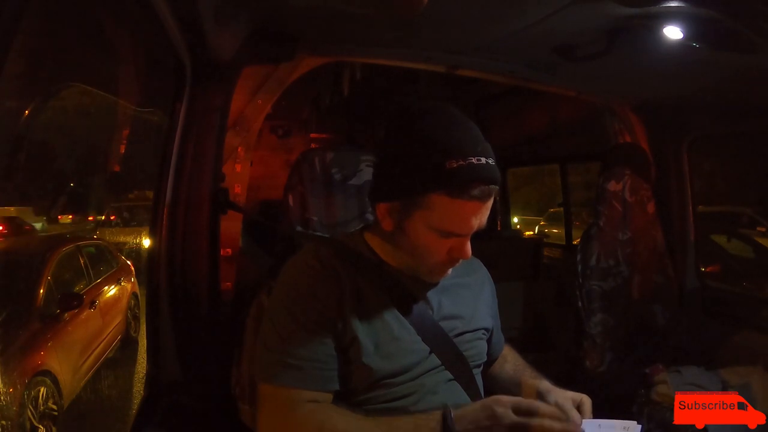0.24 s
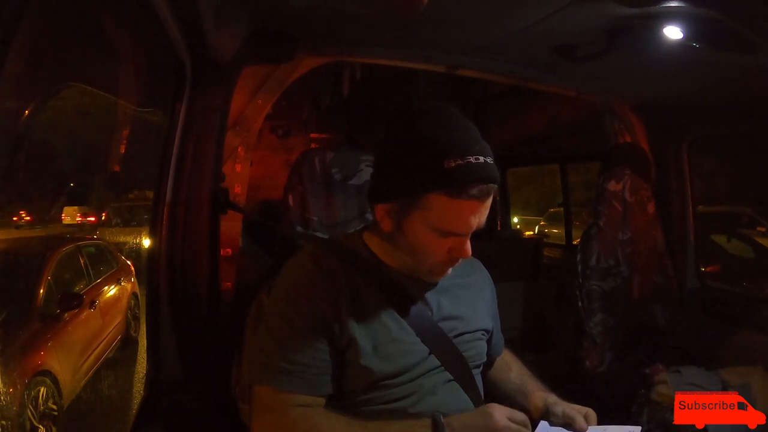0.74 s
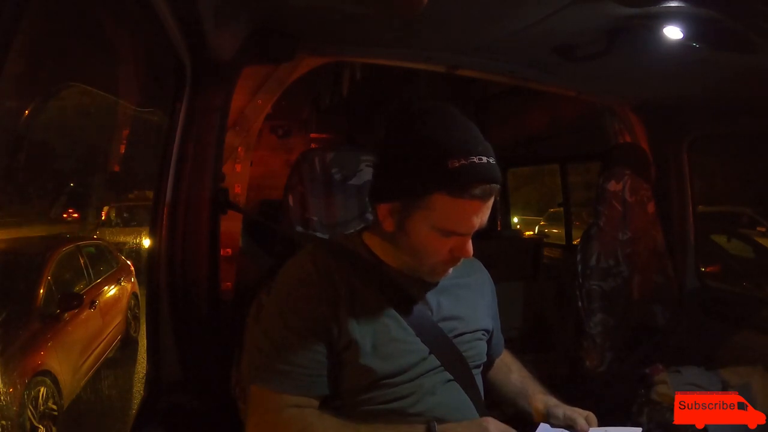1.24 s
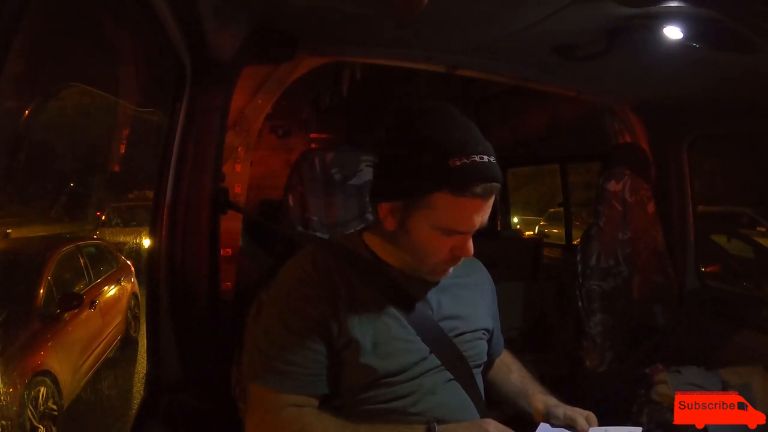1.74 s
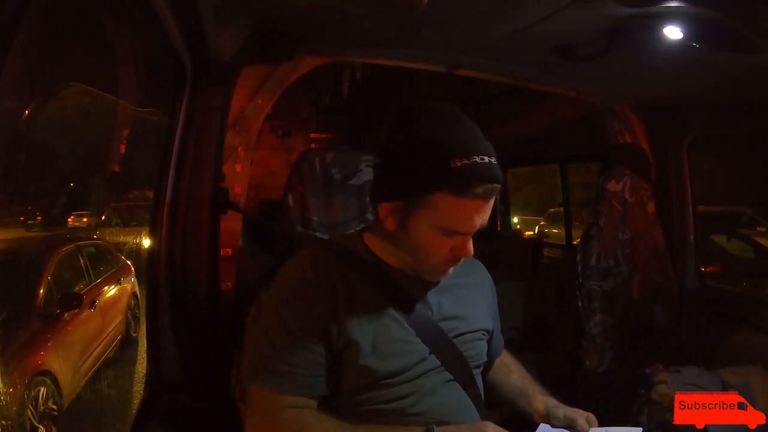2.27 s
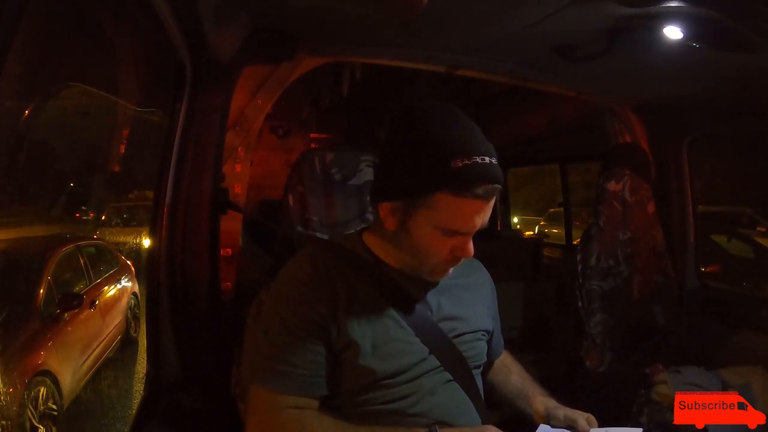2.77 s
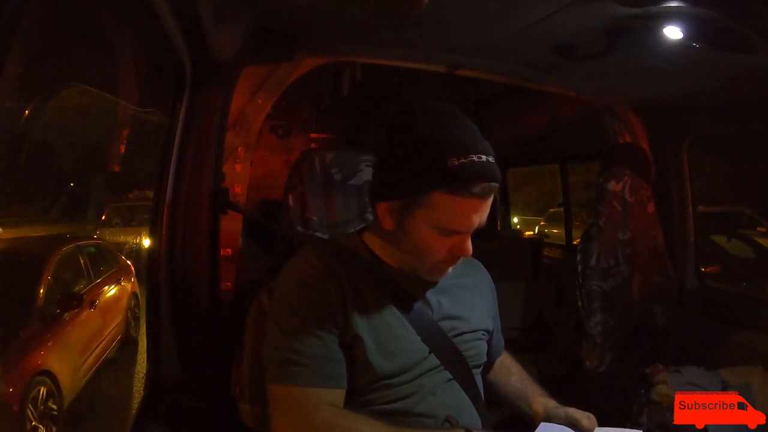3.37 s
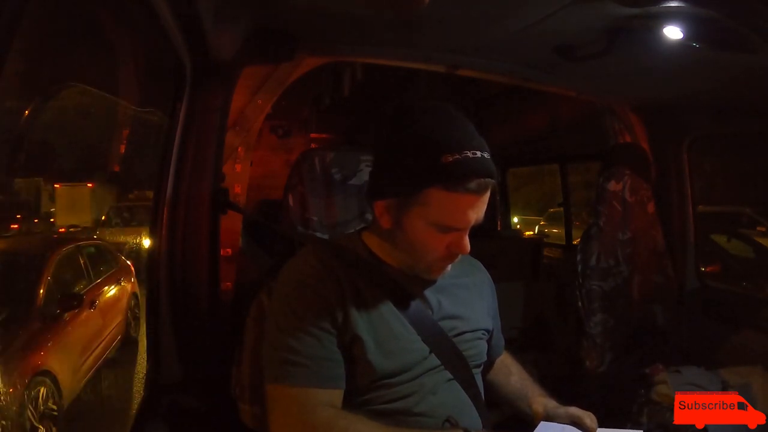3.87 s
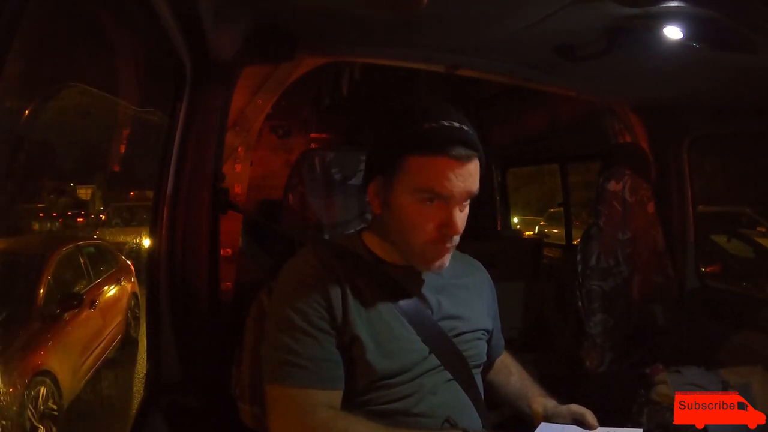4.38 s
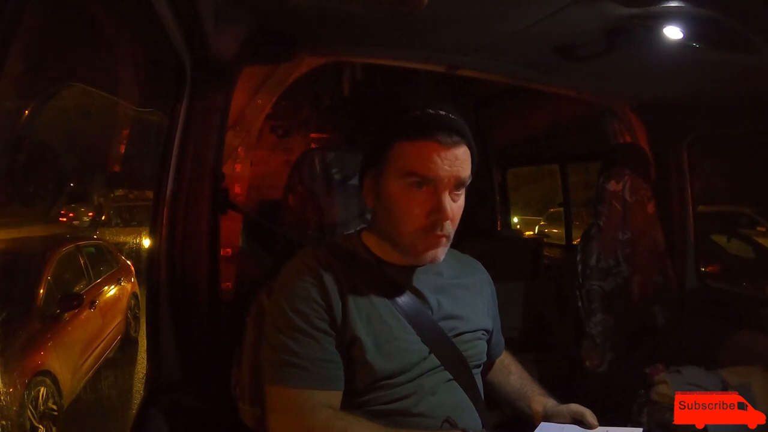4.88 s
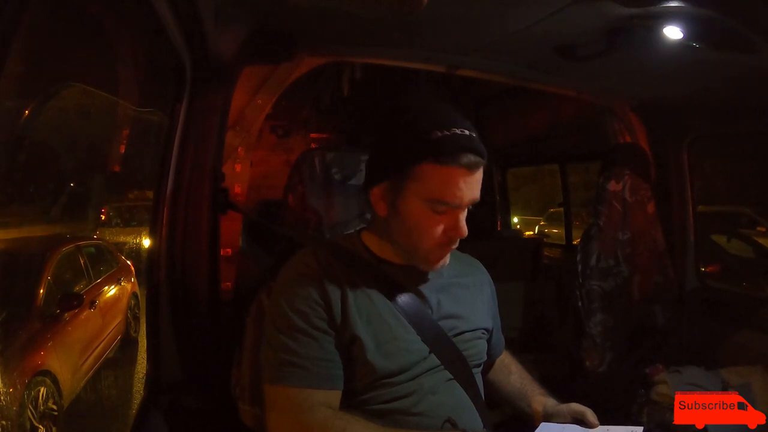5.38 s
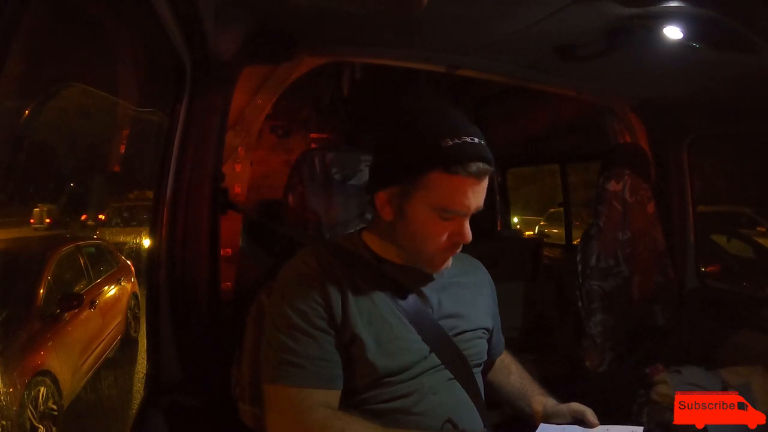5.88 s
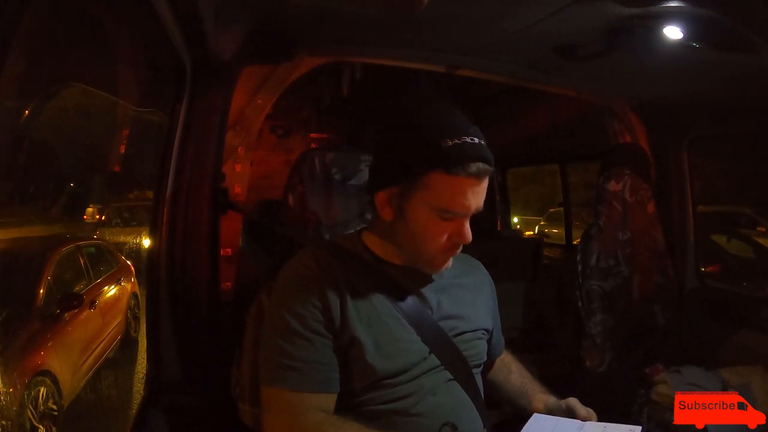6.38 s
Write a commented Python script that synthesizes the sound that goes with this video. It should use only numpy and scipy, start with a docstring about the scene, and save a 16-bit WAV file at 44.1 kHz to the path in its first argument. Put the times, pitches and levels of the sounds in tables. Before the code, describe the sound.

A low diesel idle and the rumble of queued traffic fill a van's cab throughout. In the first half second a hand slides softly over paper, with a few small crinkles. From about 1 second a twin-cylinder motorcycle approaches, its muffled exhaust rising and falling in short throttle blips and booming in the cab. It grows clearly louder from 2.5 seconds, with thin engine clatter and a faint tyre hiss at the side window. It is loudest alongside at about 3.3 to 3.7 seconds, burbling and giving a quick run of five deep pops. After 4 seconds it is quieter, revving several more times as it pulls away, and is gone by about 5.8 seconds. The idle and rumble carry on with slight low swells, and the paper rubs and crinkles faintly again from 6.2 seconds to the end.

```python
"""Inside a van idling in a traffic queue. A twin-cylinder motorcycle filters past, on and off the throttle.
Its exhaust orders boom in the cab; uneven firings burble and pop alongside, then it pulls away.
Valve and chain clatter comes through the side window and rings the glass. The driver slides a hand
over a sheet of paper. Under it all: diesel hum, droning trim, rumble of the queue."""
import sys
import numpy as np
from scipy import signal
from scipy.fft import rfft, irfft, next_fast_len
from scipy.io import wavfile
from scipy.ndimage import uniform_filter1d, map_coordinates

SR = 44100
rng = np.random.default_rng(int(sys.argv[2]) if len(sys.argv) > 2 else 0)


def digitize_waveform(pressure):
    """Quantize a signal to 16-bit integers and store it at the path in sys.argv[1].

    Rows of a 2-D input are taken as channels; values are limited to [-1, 1].
    """
    field = np.atleast_2d(pressure).T
    bounded = np.clip(field, -1, 1)
    quanta = np.round(bounded * 32767).astype(np.int16)
    wavfile.write(sys.argv[1], SR, quanta)


N = 291957
T = np.arange(N) / SR

# throttle twists: open/s, start rate/Hz, close/s, peak rate/Hz, rise exponent, opening/0-1
TWISTS = [(.12, 49, .3, 56, 0.83, .4), (1, 41.44, 1.2, 44.5, 1.01, 0.57),
          (1.33, 39.2, 1.45, 46.31, 1.04, 0.29), (1.53, 45.39, 1.69, 54.88, 1.08, 0.56),
          (1.99, 40.55, 2.28, 53.94, 1.09, 0.38), (2.6, 41.48, 2.755, 57.83, 0.89, 0.49),
          (3.15, 31.53, 3.26, 42.03, 1.086, 0.84), (3.34, 34.12, 3.42, 44.95, 0.61, 0.19),
          (3.65, 37.8, 3.95, 49.62, .65, 0.16), (4.16, 35.78, 4.46, 37.36, 1.1, 0.21),
          (4.48, 37.46, 4.525, 39.84, 1.024, .4), (4.55, 40.02, 4.75, 43.19, 1.63, 0.31),
          (4.85, 40.44, 5.0, 44.42, 0.95, .35), (5.11, 40.06, 5.255, 46, 1.77, 0.24)]
# exhaust reaching the cab between the cars: t/s, level/dB
EXHAUST_LEVEL = [(.2, -58), (1, -43), (1.45, -33), (2.1, -41), (2.6, -27.5), (3.08, -26.5), (3.24, -26),
                 (3.29, -30), (3.6, -23.5), (3.96, -22.5), (4.05, -33), (4.6, -33.5), (5.05, -34.5),
                 (5.6, -42)]
# firing unevenness: t/s, roughness/0-1
ROUGHNESS = [(1.7, 0.08), (2.4, 0.25), (2.9, 0.3), (3.3, 0.13), (3.42, 0.34), (3.66, 0.34), (3.75, 0.1),
             (4.2, 0.12), (4.65, 0.12), (5.3, 0.24)]
# cab standing waves, for the low orders: f/Hz, gain/dB
CAB_RESPONSE = [(33, -16), (46, -19), (55, -9), (70, -7), (100, -7.5), (120, -2.5), (135, -2), (150, -9),
                (172, -12.5), (205, -2.5), (245, -1), (265, -2), (290, -5.5)]
# orders 1, 3, 5: full-throttle gain/dB, gain once past/dB
LOW_ORDER_GAINS = [(1, -11.5), (-5, -3.5), (-1.5, -3.5)]
# exhaust overtones: f/Hz, level/dB
BARK_SPECTRUM = [(200, 6.5), (260, 2.5), (330, 4), (400, 3), (460, -3), (530, -9), (590, -6), (670, -13),
                 (735, -15.5), (800, -31), (870, -18.5), (950, -24.5), (1220, -25.5), (1800, -36)]
# one order booms in the cab: t/s, f/Hz, level/dB, half-width/s
BOOMS = [(.2, 262, -42, 0.043), (.37, 265, -41, 0.08), (1, 212, -40.5, 0.042), (1.431, 135, -31.5, 0.03),
         (1.69, 56, -42, 0.075), (1.418, 370, -46.5, 0.12), (1.667, 387, -41.5, 0.088),
         (1.69, 445, -41.5, 0.12), (1.96, 205, -37, 0.23), (2.064, 355, -40.5, 0.053),
         (2.201, 52, -37, 0.03), (2.359, 255, -33, 0.054), (2.604, 124, -25, 0.033),
         (2.684, 255, -21.5, 0.019), (2.737, 56, -36.5, 0.12), (2.86, 255, -30, 0.044),
         (2.865, 148, -29.5, 0.037), (2.96, 130, -25, 0.044), (3.082, 108, -23.5, 0.028),
         (3.288, 116, -18.5, 0.015), (3.327, 108, -16.5, 0.033), (3.372, 205, -25, 0.017),
         (3.384, 125, -19, 0.026), (3.42, 45, -28.5, 0.031), (3.756, 225, -26.5, 0.028),
         (3.8, 735, -40.5, 0.03), (3.87, 338, -40.5, 0.14), (3.82, 372, -32.5, 0.062),
         (3.84, 512, -38.5, .07), (3.901, 590, -38, 0.032), (3.906, 242, -22, 0.038),
         (3.91, 145, -30, 0.054), (3.972, 48, -39, 0.036), (4.21, 860, -53, 0.1), (4.236, 180, -30, 0.1),
         (4.2, 400, -42, 0.11), (4.44, 190, -32, 0.081), (4.415, 595, -48, .07), (4.425, 410, -36.5, .08),
         (4.592, 445, -42, .06), (4.595, 645, -47, 0.062), (4.704, 210, -41, 0.061),
         (4.751, 128, -32.5, 0.18), (4.703, 335, -39.5, .08), (4.743, 560, -56, 0.065),
         (4.923, 340, -34, 0.055), (4.957, 480, -46, 0.098), (5.143, 320, -36.5, .04),
         (5.152, 651, -42.5, 0.044), (5.265, 505, -46.5, 0.11), (4.989, 131, -29, 0.064),
         (5.04, 212, -34, .03), (5.277, 228, -34.5, 0.04), (5.28, 275, -35.5, 0.024), (5.4, 130, -39, 0.21)]
# exhaust pulses: f/Hz, density/dB
THUD_SPECTRUM = [(25, -37), (50, -14.5), (80, 0), (125, 7.5), (170, -2), (240, -4.5), (330, -12),
                 (600, -79)]
# gas noise: f/Hz, density/dB
RASP_SPECTRUM = [(100, -37), (200, 2), (380, 6.5), (480, 1), (600, -6.5), (780, -13), (950, -26),
                 (1400, -25.5), (1900, -35.5), (3000, -44.5), (5000, -60.5), (8000, -85)]
# uneven combustion: t/s, half-width/s, thud/dB, rasp/dB
SPUTTERS = [(2.204, 0.043, -30.5, -47), (2.327, 0.078, -34.5, -58), (2.505, 0.049, -34, -30.5),
            (2.709, 0.067, -32, -32), (3.046, 0.036, -29, -45), (3.199, 0.059, -27.5, -43),
            (3.419, 0.072, -26, -24), (3.596, 0.04, -24, -30.5), (3.684, 0.028, -27.5, -25.5),
            (3.932, 0.037, -52, -34.5), (4.99, 0.092, -41.5, -43.5), (5.218, 0.089, -43.5, -38.5)]
# exhaust pops: t/s, then level/dB for each of the three modes
POPS = [(3.474, -11.5, -20, -31.5), (3.505, -9, -29.5, -36), (3.537, -4.5, -4, -21),
        (3.589, -9.5, -14, -27.5), (3.642, -15.5, -28, -24)]
# cab modes: f/Hz, T60/s
POP_MODES = [(118, 0.16), (245, 0.15), (440, 0.069)]
# gas rushes: t/s, half-width/s, f/Hz, bandwidth/Hz, level/dB
ROARS = [(3.41, .045, 740, 130, -43), (3.69, .03, 700, 160, -41), (3.83, .11, 1190, 200, -48.5)]
# clatter at the side window: t/s, level/dB
CLATTER_LEVEL = [(1.4, -86), (1.7, -74), (2.1, -69), (2.5, -66), (2.75, -59.5), (2.95, -63), (3.17, -58),
                 (3.26, -51.5), (3.33, -54), (3.44, -51.5), (3.7, -63), (3.92, -59.5), (4.3, -65),
                 (4.7, -61), (5.25, -66), (5.6, -73.5)]
# clatter through the window: f/Hz, density/dB
CLATTER_SPECTRUM = [(800, -38), (1800, -13.5), (2500, 1), (3200, -1), (4100, 1), (4400, -4), (5000, -8),
                    (5600, -15), (7000, -25), (12000, -60.5)]
# side glass: f/Hz, bandwidth/Hz, approaching/dB, leaving/dB, van idle/dB
GLASS_BANDS = [(3340, 75, 0, -20, -14), (3550, 150, -4.5, -12.5, -17.5), (3730, 120, -6.5, -2.5, -13),
               (4044, 110, 0, 1, 2.5), (4167, 110, -5, -7, -3), (4620, 220, -4.5, -8.5, -4.5),
               (5270, 250, -19, -19.5, -26.5), (6050, 120, -25.5, -17.5, -25)]
# glass sings at rev peaks: t/s, half-width/s, level/dB
GLASS_SWELLS = [(1.709, 0.064, -71), (2.73, 0.085, -59), (3.247, 0.027, -58), (4.65, 0.17, -75.5),
                (5.171, 0.19, -68.5)]
# tyre hiss: t/s, half-width/s, level/dB
TYRE_SWELLS = [(2.954, 0.56, -76), (3.082, 0.07, -73.5), (3.27, 0.046, -69), (3.42, 0.2, -69),
               (4.744, 0.23, -81), (5.22, 0.18, -88.5)]
# tyre hiss: f/Hz, density/dB
TYRE_SPECTRUM = [(2500, -35.5), (4800, 3.5), (6000, 0.5), (6800, -2), (8000, -7), (10000, -11),
                 (11600, -11.5), (13000, -26)]
# hand on paper: start/s, end/s, rub/dB, fine hiss/dB
STROKES = [(0.037, 0.202, -59.5, -73.5), (0.188, 0.22, -77.5, -70), (0.257, 0.383, -68, -92),
           (4.07, 4.085, -72, -80), (6.15, 6.62, -66.5, -98), (6.288, 6.345, -70, -89.5),
           (6.481, 6.503, -65, -80.5)]
# paper rub and crinkle: f/Hz, density/dB
PAPER_SPECTRUM = [(900, -10.5), (2200, 5), (3200, 2.5), (5000, -2.5), (6400, -9.5), (7800, -13),
                  (9500, -18.5), (11300, -19), (13000, -28)]
# fine paper hiss: f/Hz, density/dB
SHEEN_SPECTRUM = [(4000, -29), (7400, 1), (9000, -8), (11100, -3), (13000, -12.5)]
# paper flexing: t/s, snap/dB, snap f/Hz, snap T60/s, crinkle/dB, crinkle T60/s
PAPER_TICKS = [(0.0901, -37, 2050, 0.016, -51, 0.081), (0.5404, -38, 2930, .006, -49, 0.023),
               (0.547, -56, 4180, .006, -56, 0.056), (6.487, -45, 2800, .02, -51, 0.066),
               (6.5615, -44, 4080, 0.023, -66, 0.017), (6.572, -53, 3950, .02, -70, .02)]
# van idle: firing order, level/dB
IDLE_ORDERS = [(1, -56.5), (2, -43), (3, -43.5), (4, -59.5), (5, -40), (6, -49.5), (7, -42), (9, -54.5),
               (11, -50), (14, -49.5)]
# belt whines: f/Hz, level/dB
BELT_WHINES = [(333.8, -48), (386, -54), (420, -49.5), (748, -61)]
# second-order idle shudder: t/s, half-width/s, level/dB
SHUDDERS = [(.14, .05, -37), (.28, .035, -34), (1.06, .03, -38), (6.55, .05, -49)]
# trim panels: f/Hz, bandwidth/Hz, level/dB
TRIM_BANDS = [(598, 51, 2), (762, 55, -0.5), (862, 65, -2), (1024, 84, -6)]
# trim drone re rumble: t/s, level/dB
TRIM_LEVEL = [(0, -7.5), (.3, -14.5), (4, -17.5), (6.62, -15.5)]
# idle and queue rumble: t/s, level/dB
RUMBLE_LEVEL = [(0, -35), (1.3, -34.5), (2.5, -35), (4.15, -39), (5, -36), (5.7, -34), (6.62, -33)]
# rumble in the cab: f/Hz, density/dB
RUMBLE_SPECTRUM = [(12, -39.5), (24, -20), (36, -14.5), (46, 2.5), (70, -8.5), (120, 4), (170, -3.5),
                   (280, 1.5), (470, -10), (700, -14), (1400, -22.5), (1850, -32), (2700, -36.5),
                   (4800, -47), (12000, -83.5)]
# traffic swells in the main cab mode: t/s, half-width/s, level/dB
SURGES = [(5.751, 0.068, -43), (6.17, 0.059, -40), (6.56, 0.13, -36)]

FIRING_GAP_CYCLES = 3 / 8


def motorcycle():
    """One unsteady crankshaft drives exhaust and clatter; the tone hardens as the pipes face the cab."""
    pass_s, turn_s = 3.546, 0.16
    rate_hz, throttle = riding()
    cycle = np.cumsum(rate_hz * (1 + .005 * wobble(35))) / SR
    near = amp(curve(EXHAUST_LEVEL)) * within(EXHAUST_LEVEL, fade_s=0.36)
    past = (1 + np.tanh((T - pass_s) / turn_s)) / 2
    pipes = exhaust(rate_hz, cycle, throttle, past, near) + burble(cycle, throttle, past, near)
    pipes = pipes + pops() + roars()
    window = (clatter(cycle, throttle) + tyres()) * within(CLATTER_LEVEL, fade_s=.25)
    return pipes + window + gears()


def riding():
    """Cycle rate and throttle: revs climb while it is open, then sink until the next twist."""
    flywheel_s, throttle_s, coast_exponent = .025, 0.0069, 1.2
    end_s, end_hz = 5.75, 38
    rate_hz, throttle = np.full(N, float(TWISTS[0][1])), np.zeros(N)
    following = [row[:2] for row in TWISTS[1:]] + [(end_s, end_hz)]
    for twist, (next_s, next_hz) in zip(TWISTS, following):
        open_s, low_hz, close_s, high_hz, exponent, opening = twist
        rate_hz += (high_hz - low_hz) * ramp(open_s, close_s) ** exponent
        rate_hz -= (high_hz - next_hz) * (1 - (1 - ramp(close_s, next_s)) ** coast_exponent)
        throttle += opening * ((T >= open_s) & (T < close_s))
    return eased(rate_hz, flywheel_s), eased(throttle, throttle_s)


def exhaust(rate_hz, cycle, throttle, past, near):
    """Orders of two unevenly spaced firings; the pipes partly cancel some, the cab booms on others."""
    pull_db, base_db, rear_db = -20.5, -24.5, -12
    mismatch, jitter_cycles, wander_rad = 0.26, .026, .4
    gains = {}
    for k, (throttle_db, past_db) in zip((1, 3, 5), LOW_ORDER_GAINS):
        cab_db = along(CAB_RESPONSE, k * rate_hz)
        gains[k] = near * amp(cab_db + throttle_db * throttle + past_db * past + 2 * wobble(20))
    bark = near * (amp(pull_db) * throttle + amp(base_db) + amp(rear_db) * past)
    for k in range(6, 41):
        uncancelled = mismatch + (1 - mismatch) * np.cos(np.pi * k * FIRING_GAP_CYCLES) ** 4
        waver_db = 3 * wobble(12) + 2 * wobble(28)
        gains[k] = bark * uncancelled * amp(along(BARK_SPECTRUM, k * rate_hz) + waver_db)
    for t_s, hz, db, half_s in BOOMS:
        nearest = min(gains, key=lambda k: abs(k * np.interp(t_s, T, rate_hz) - hz))
        gains[nearest] += amp(db) * swell(t_s, half_s)
    strength = 1 + firing_scatter(cycle)
    uneven = cycle + jitter_cycles * firing_scatter(cycle)
    # reflections off the queued cars shift each order's phase
    return strength * sum(gain * tone(k * uneven, wander_rad) for k, gain in gains.items())


def firing_scatter(cycle):
    """Combustion unevenness: two random values a cycle, interpolated."""
    return curve(ROUGHNESS) * map_coordinates(rng.standard_normal(N), [2 * cycle], order=1)


def burble(cycle, throttle, past, near):
    """Firings above or below mean strength thud in the cab, over pulsing gas noise."""
    base_thud_db, past_thud_db, cab_t60_s = -12.5, -6, .12
    pull_db, base_db, rear_db = -21, -18, -12.5
    thud_gain = near * amp(base_thud_db + past_thud_db * past)
    rasp_gain = near * (amp(pull_db) * throttle + amp(base_db) + amp(rear_db) * past)
    for t_s, half_s, thud_db, rasp_db in SPUTTERS:
        thud_gain += amp(thud_db) * swell(t_s, half_s)
        rasp_gain += amp(rasp_db) * swell(t_s, half_s)
    count = np.floor(cycle) + np.floor(cycle + FIRING_GAP_CYCLES)
    firings = np.diff(count, prepend=count[0])
    cab_tail = (rng.standard_normal(N) * amp(-60 * T / cab_t60_s))[:SR // 5]
    pulses = signal.fftconvolve(firings * np.sign(rng.standard_normal(N)), cab_tail)[:N]
    thud = thud_gain * coloured(pulses, THUD_SPECTRUM)
    rasp = rasp_gain * coloured(puffs(2 * cycle, depth=0.089), RASP_SPECTRUM)
    return thud + rasp


def pops(attack_s=0.0075):
    """Exhaust pops alongside ring the cab's standing waves."""
    out = np.zeros(N)
    for t_s, *levels_db in POPS:
        age_s = np.maximum(T - t_s, 0)
        onset = 1 - np.exp(-age_s / attack_s)
        for db, (hz, t60_s) in zip(levels_db, POP_MODES):
            out += onset * amp(db - 60 * age_s / t60_s) * np.sin(2 * np.pi * hz * age_s)
    return out


def roars():
    """Short gas rushes, each ringing one upper band of the cab."""
    return sum(amp(db) * swell(t_s, half_s) * ringing(rng.standard_normal(N), [(hz, width_hz, 0)])
               for t_s, half_s, hz, width_hz, db in ROARS)


def clatter(cycle, throttle):
    """Valve and chain noise, direct and ringing in the side glass."""
    pull_db, ring_db, cleared_db = 2, 2.2, -8.5
    level_db = curve(CLATTER_LEVEL)
    direct = amp(level_db + pull_db * throttle) * coloured(puffs(2 * cycle, depth=0.068), CLATTER_SPECTRUM)
    cleared = ramp(3.083, 3.42)  # engine leaves the window
    ring_gain = amp(level_db + ring_db + cleared_db * cleared) + swells(GLASS_SWELLS)
    # struck from the other side, the glass favours other bands
    rattle = puffs(2 * cycle, depth=0.088)
    coming = ringing(rattle, [(hz, width, db) for hz, width, db, _, _ in GLASS_BANDS])
    going = ringing(rattle, [(hz, width, db) for hz, width, _, db, _ in GLASS_BANDS])
    glass = (1 - cleared) * coming + cleared * going
    return direct + ring_gain * amp(1.5 * wobble(10)) * glass


def tyres():
    """Swells of tyre hiss through the side window."""
    return swells(TYRE_SWELLS) * coloured(rng.standard_normal(N), TYRE_SPECTRUM)


def gears(peak_s=3.85, rise_s=0.29, peak_db=-59.5, fade_db_per_s=18):
    """Gear whine on pulling away: three narrow noise bands."""
    gain = ramp(peak_s - rise_s, peak_s) * amp(peak_db - fade_db_per_s * np.maximum(T - peak_s, 0))
    return gain * ringing(rng.standard_normal(N), [(2065, 81, 0), (2820, 110, -4), (3600, 80, -4)])


def paper(attack_s=0.05, release_s=0.025, snap_attack_s=.0002):
    """Grainy friction of a hand on the sheet, which snaps and crinkles as it flexes."""
    rub = coloured(rng.standard_normal(N) * amp(0.82 * wobble(300)), PAPER_SPECTRUM)
    sheen = coloured(rng.standard_normal(N), SHEEN_SPECTRUM)
    out = np.zeros(N)
    for start_s, end_s, rub_db, hiss_db in STROKES:
        stroke = ramp(start_s - attack_s, start_s) * (1 - ramp(end_s, end_s + release_s))
        out += stroke * (amp(rub_db) * rub + amp(hiss_db) * sheen)
    grain = coloured(rng.standard_normal(N), PAPER_SPECTRUM)
    for t_s, snap_db, hz, snap_t60_s, crinkle_db, crinkle_t60_s in PAPER_TICKS:
        age_s = np.maximum(T - t_s, 0)
        snap = amp(snap_db - 60 * age_s / snap_t60_s) * np.sin(2 * np.pi * hz * age_s)
        crinkle = amp(crinkle_db - 60 * age_s / crinkle_t60_s) * grain
        out += (1 - np.exp(-age_s / snap_attack_s)) * (snap + crinkle)
    return out


def van(firing_hz=26.8, hum_db=-4, glass_db=-38):
    """Diesel idle shakes trim and glass over the rumble of the queue."""
    level_db = curve(RUMBLE_LEVEL)
    cycle = np.cumsum(firing_hz * (1 + 0.002893 * wobble(5))) / SR
    hum = amp(hum_db - level_db.mean()) * idle_hum(cycle, firing_hz)
    rumble = amp(0.41 * wobble(5.2)) * coloured(puffs(cycle, depth=0.071), RUMBLE_SPECTRUM)
    trim = amp(curve(TRIM_LEVEL)) * ringing(puffs(cycle, depth=0.12), TRIM_BANDS)
    idle_bands = [(hz, width, db) for hz, width, _, _, db in GLASS_BANDS]
    glass = amp(glass_db) * ringing(puffs(cycle, depth=0.1), idle_bands)
    return amp(level_db) * (hum + rumble + trim + glass)


def idle_hum(cycle, firing_hz, waver_db=2.3, throb_db=4):
    """Firing orders and belt whines waver; the second order throbs unevenly."""
    orders = IDLE_ORDERS + [(hz / firing_hz, db) for hz, db in BELT_WHINES]
    gains = {k: amp(db + waver_db * wobble(4.4)) for k, db in orders}
    gains[2] = gains[2] * amp(throb_db * wobble(9)) + swells(SHUDDERS)
    return sum(gain * tone(k * cycle) for k, gain in gains.items())


def traffic(mode_hz=124.7, width_hz=24):
    """Traffic rumble surges in the cab's main standing wave."""
    return swells(SURGES) * ringing(rng.standard_normal(N), [(mode_hz, width_hz, 0)])


def amp(db):
    """dB to gain."""
    return 10 ** (np.asarray(db) / 20)


def unit(x):
    """Scale to rms 1."""
    return x / np.sqrt(np.mean(x ** 2) + 1e-20)


def along(points, hz):
    """Interpolate (f/Hz, level/dB) on a log axis."""
    f, db = np.transpose(points)
    return np.interp(np.log(hz + 1), np.log(f + 1), db)


def curve(rows):
    """Interpolate (t/s, value) per sample."""
    return np.interp(T, *np.transpose(rows))


def within(rows, fade_s):
    """1 while a curve lasts, fading to 0 outside."""
    start_s, end_s = rows[0][0], rows[-1][0]
    return np.interp(T, [start_s - fade_s, start_s, end_s, end_s + fade_s], [0, 1, 1, 0])


def ramp(start_s, end_s):
    """Linear rise, 0 to 1."""
    return np.clip((T - start_s) / (end_s - start_s), 0, 1)


def eased(x, span_s):
    """Moving average."""
    return uniform_filter1d(x, max(1, int(span_s * SR)))


def swell(t_s, half_s):
    """Bell curve, 1/e at half_s from its peak."""
    return np.exp(-((T - t_s) / half_s) ** 2)


def swells(rows):
    """Sum of bells (t/s, half-width/s, level/dB)."""
    return sum(amp(db) * swell(t_s, half_s) for t_s, half_s, db in rows)


def wobble(knots_per_s):
    """Smooth random curve."""
    return map_coordinates(rng.standard_normal(int(N * knots_per_s / SR) + 4), [T * knots_per_s])


def tone(cycle, wander_rad=0):
    """Sine at rms 1, random start phase, optional phase wander."""
    phase = 2 * np.pi * (cycle + rng.random())
    if wander_rad:
        phase += wander_rad * wobble(16)
    return np.sqrt(2) * np.sin(phase)


def puffs(cycle, depth):
    """Noise swelling once a cycle."""
    return rng.standard_normal(N) * np.exp(depth * np.cos(2 * np.pi * cycle))


def filtered(x, response):
    """FFT filter with gain response(hz)."""
    size = next_fast_len(N + SR // 2)
    return irfft(rfft(x, size) * response(np.fft.rfftfreq(size, 1 / SR)), size)[:N]


def coloured(x, spectrum):
    """x through (f/Hz, level/dB), at rms 1."""
    return unit(filtered(x, lambda hz: amp(along(spectrum, hz))))


def ringing(x, bands):
    """x through mode clusters (f/Hz, bandwidth/Hz, level/dB), at rms 1."""
    def response(hz):
        return sum(amp(db) / np.sqrt(1 + (2 * (hz - mid) / width) ** 6) for mid, width, db in bands)
    return unit(filtered(x, response))


def scene():
    """Mono mix in the cab."""
    return (van() + traffic() + motorcycle() + paper())[None]


def record(dry):
    """Brick-wall low-pass."""
    top_hz = 13100
    return np.array([filtered(x, lambda hz: hz < top_hz) for x in dry])


dry = scene()
out = record(dry)
digitize_waveform(out)
```